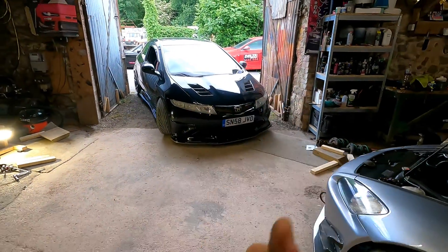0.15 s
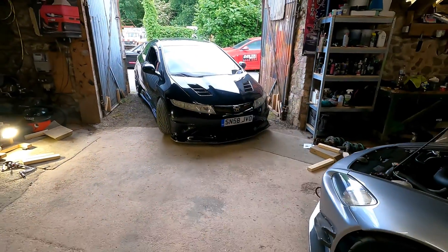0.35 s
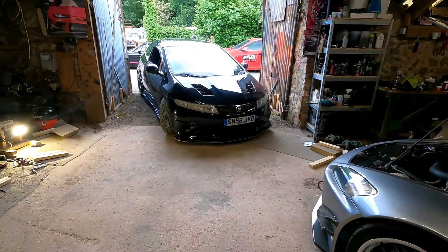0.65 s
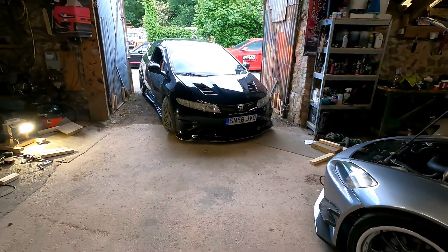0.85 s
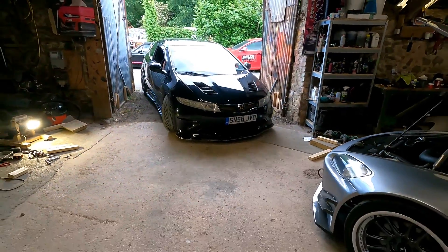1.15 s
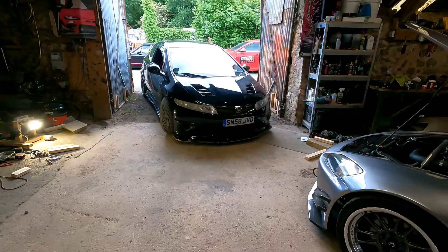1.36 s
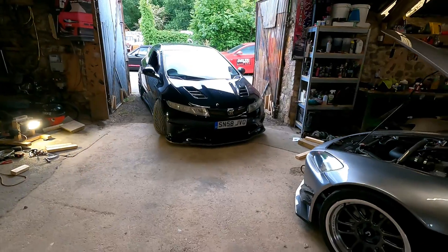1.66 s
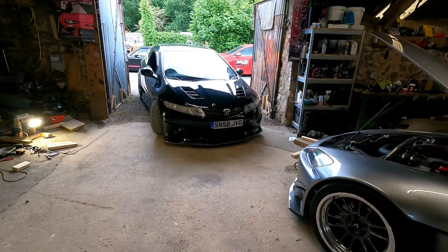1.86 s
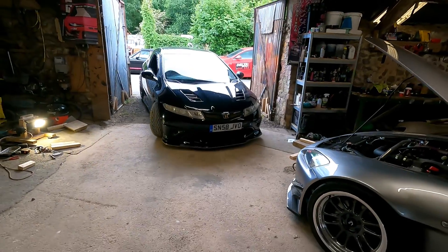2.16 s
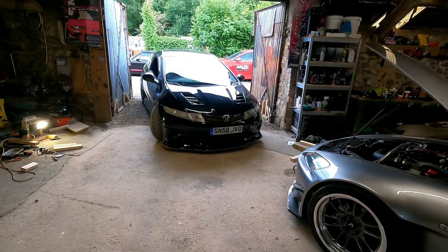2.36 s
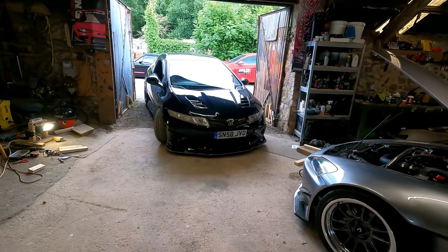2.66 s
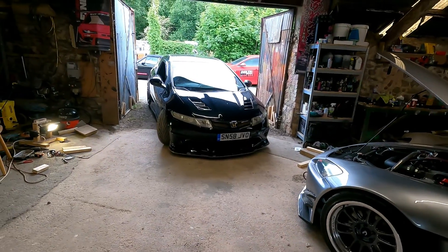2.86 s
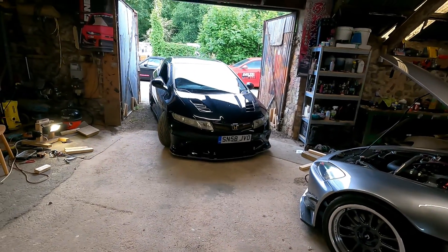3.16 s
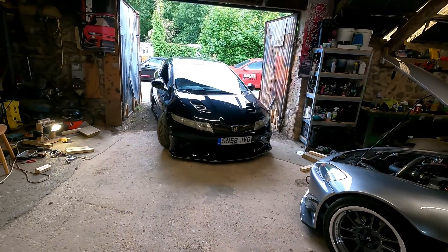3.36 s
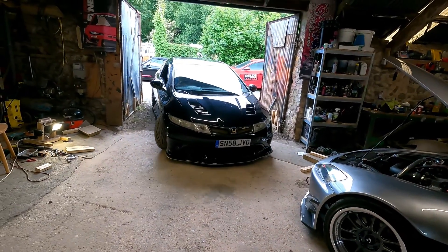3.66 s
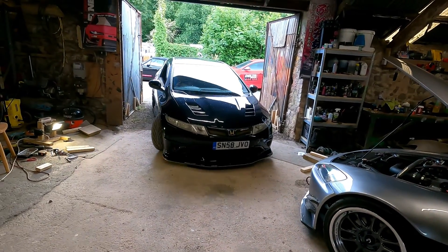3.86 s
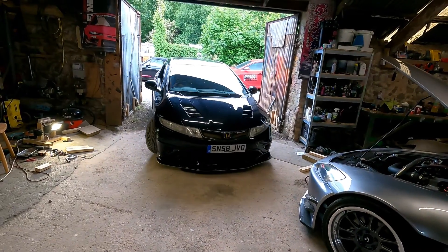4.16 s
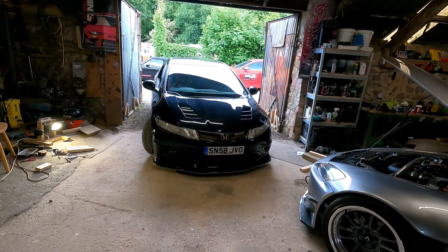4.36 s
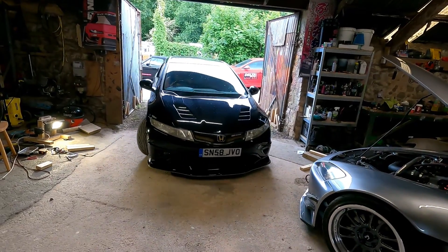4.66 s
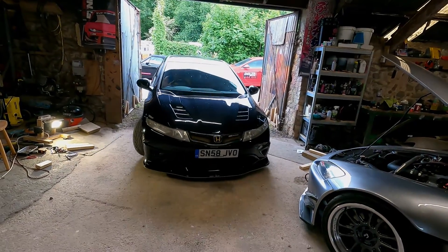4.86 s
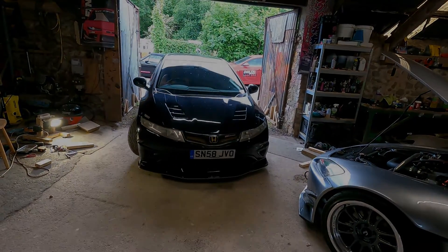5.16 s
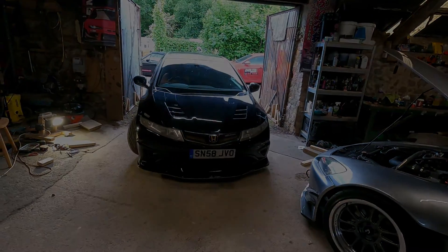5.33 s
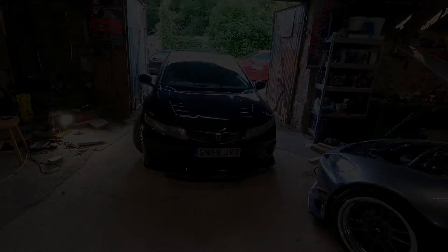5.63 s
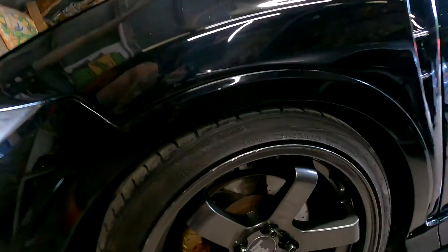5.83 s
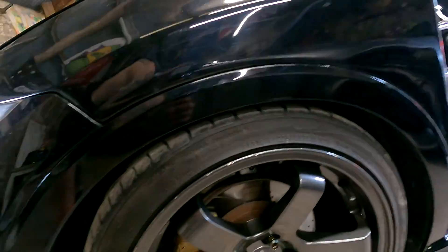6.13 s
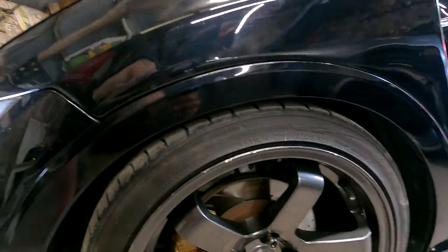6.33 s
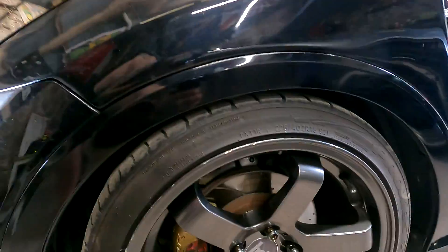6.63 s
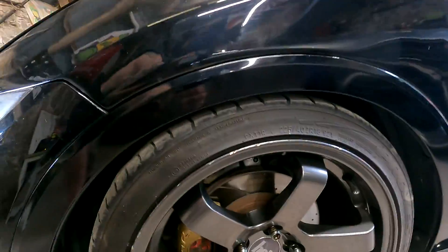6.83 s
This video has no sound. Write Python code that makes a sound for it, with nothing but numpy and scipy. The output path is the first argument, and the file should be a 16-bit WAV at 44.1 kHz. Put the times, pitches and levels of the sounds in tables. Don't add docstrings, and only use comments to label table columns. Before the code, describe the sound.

Microphone inside a garage, facing an idling car at the doorway. Boomy exhaust pulses, metallic rattling and small knocks give way to a quick double rev, the second higher and harder, with air tearing through the intake. The engine note sinks steadily and fades to nothing, then snaps back as a closer, even idle with mechanical rattle and hiss.

```python
import sys
import numpy as np
from scipy import signal
from scipy.fft import rfft, irfft, next_fast_len
from scipy.io import wavfile
from scipy.ndimage import uniform_filter1d, map_coordinates

SR = 44100
rng = np.random.default_rng(int(sys.argv[2]) if len(sys.argv) > 2 else 0)


def gain_from_db(level_db):
    decades = np.asarray(level_db, float) / 20
    return 10 ** decades


def pcm_store(signal):
    levels = np.round(np.clip(np.atleast_2d(signal), -1, 1) * 32767)
    wavfile.write(sys.argv[1], SR, levels.astype(np.int16).T)


N = 308259
T = np.arange(N) / SR
CUT = 5.829
NEAR = T >= CUT


def unit(x):
    return x / np.sqrt(np.mean(x ** 2) + 1e-20)


def steady(x, span):
    size = round(span * SR)
    power = uniform_filter1d(uniform_filter1d(x ** 2, size), size)
    return x / np.sqrt(np.abs(power) + 1e-12)


def along(points, hz):
    f, v = np.transpose(points)
    return np.interp(np.log(hz + 1), np.log(f + 1), v)


def curves(table):
    s, *cols = np.transpose(table)
    return [np.interp(T, s, c) for c in cols]


def ramp(start_s, span_s):
    return np.clip((T - start_s) / span_s, 0, 1)


def swells(rows, rise_db_s, fall_db_s):
    s, db, hold = np.transpose(rows)[:, :, None]
    early = np.clip(s - T, 0, None)
    late = np.clip(T - s - hold, 0, None)
    return np.max(db - rise_db_s * early - fall_db_s * late, axis=0)


def wobble(rate):
    knots = rng.standard_normal(int(N * rate / SR) + 4)
    return map_coordinates(knots, [np.arange(N) * rate / SR])


def filtered(x, response):
    m = next_fast_len(x.shape[-1] + SR // 2)
    return irfft(rfft(x, m) * response(np.fft.rfftfreq(m, 1 / SR)), m)[..., :x.shape[-1]]


def ringing(x, modes):
    def response(f):
        total = 0
        for k, (c, w, db) in enumerate(modes):
            total = total + (-1) ** k * gain_from_db(db) * 1j * f * w / (c * c - f * f + 1j * f * w)
        return total
    return filtered(x, response)


# f/Hz, likeness
ALIKENESS = [(60, 0.88), (150, 0.99), (370, 0.62), (930, 0.8), (2320, 0.63), (5790, 0.69), (14400, 0.92)]


def spread(pair, spectrum):
    def response(hz):
        turn = np.arccos(np.clip(along(ALIKENESS, hz), -1, 1)) / 2
        return gain_from_db(along(spectrum, hz)) * [np.cos(turn), np.sin(turn)]
    mid, side = filtered(pair, response)
    return unit(np.array([mid + side, mid - side]))


def patchy(patchy_db):
    z = signal.stft(rng.standard_normal((2, N)), nperseg=512)[2]
    field = uniform_filter1d(rng.standard_normal(z.shape[1:]), 5, 0)
    field = uniform_filter1d(field, 8, 1)
    return signal.istft(z * gain_from_db(patchy_db * unit(field)), nperseg=512)[1][:, :N]


# t/s, firings per second
FIRING_RATE = [(0, 28.3), (.8, 26.4), (1.65, 28.7), (2.72, 28.3), (2.85, 43), (2.93, 61.5), (3.08, 73.5),
               (3.22, 79.5), (3.37, 112), (3.48, 122), (3.7, 98.5), (3.92, 78), (4.2, 63.8), (4.6, 51.3),
               (4.95, 41.6), (5.3, 33.3), (5.6, 27.9), (6.99, 28.1)]
IDLE_RATE = FIRING_RATE[0][1]


def firing_rate():
    return curves(FIRING_RATE)[0]


# t/s, effort level/dB, load level/dB (sharpens the pulses)
EFFORT = [(0, 2, 0), (.25, -5.5, -0.5), (.7, -4, 0), (1.5, 0.5, -1.5), (2.68, -2.5, 1.5), (2.77, -2.5, 6),
          (2.88, -1, 7), (3.02, 2, 6.5), (3.15, -7.5, 6.5), (3.24, 4.5, 7.5), (3.32, 4.5, 6.5), (3.4, 1, 7),
          (3.52, -5.5, 1.5), (3.76, 7.5, 0), (3.95, -3, 3), (4.4, -0.5, 0.5), (5.27, -0.5, -4.5),
          (5.42, -4, -7)]


def effort_and_load():
    return np.where(NEAR, [[-3], [0]], curves(EFFORT))


CYLINDER_DB = [0, -1.6, .3, -1.4]


def uneven_firings(crank):
    at = np.flatnonzero(np.diff(np.floor(crank)))
    strength = gain_from_db(np.resize(CYLINDER_DB, len(at)) + 1.1 * rng.standard_normal(len(at)))
    return unit(np.bincount(at, strength - strength.mean(), len(crank)))


ORDER_DB = [-8.5, -12, -10.5, -12.5, -14, -14.5, -17.5, -32.5, -16, -20.5]
# t/s, level/dB
ROUGHNESS = [
    (0, 7),
    (.3, 13),
    (1.3, 14),
    (1.6, 19),
    (2.7, 19),
    (2.95, 12),
    (5.8, 12),
    (5.85, 10),
]
LEAD = SR // 4


def exhaust_pulses(turns):
    crank = np.r_[-IDLE_RATE * np.arange(LEAD, 0, -1) / SR, turns]
    phase = rng.uniform(0, 2 * np.pi, 24)
    size = gain_from_db(np.pad(ORDER_DB, (2, 24), "edge"))
    revving = np.clip((firing_rate() - 29) / 12, 0, 1)
    waver = [gain_from_db((.7 + 1.2 * revving) * wobble(13)) for _ in range(4)]
    second_gain = gain_from_db(-2.5 * (1 - revving))
    controls = [curves(ROUGHNESS)[0], *gain_from_db(effort_and_load()), second_gain, *waver]
    rough, effort, load, second_gain, *waver = np.pad(controls, ((0, 0), (LEAD, 0)), "edge")

    def order(k):
        return size[k] * waver[k % 4] * np.cos(2 * np.pi * k * crank + phase[k])

    second = second_gain * order(2)
    upper = sum(order(k) for k in range(3, 24))
    return second, upper, uneven_firings(crank), rough, effort, load


def voiced(pulses, places, rough_db, flow_db, sharp):
    second, upper, uneven, rough, effort, load = pulses
    irregular = gain_from_db(rough_db + rough) * uneven + gain_from_db(flow_db) * rng.standard_normal(len(uneven))
    drive = effort * (second + load * (upper + gain_from_db(-12) * irregular))
    heard = []
    for modes in places:
        rung = ringing(drive, modes)
        if sharp:
            rung = ringing(rung, modes)
        heard.append(rung[LEAD:])
    return np.where(NEAR, heard[1], heard[0])


# f/Hz, level/dB
FIRING_TONE_GAIN = [(28, -38), (34, -11.5), (44, -17), (56, -42), (66, -8.5), (83, -18), (97, -19),
                    (118, -18)]
# t/s, level over the tone/dB, hold/s
PULLS = [
    (3.24, 2, 0.025),
    (3.39, -7, 0.014),
]
# t/s, share lost level/dB, hold/s
LAGS = [
    (2.96, -5, 0.077),
    (3.6, -11, 0.22),
]


def firing_tone(turns):
    effort_db, _ = effort_and_load()
    follow_db = np.minimum(effort_db, 0.1 * effort_db)
    level_db = follow_db + along(FIRING_TONE_GAIN, firing_rate()) + 4.0 + 2.4 * wobble(12)
    bend = 1 + gain_from_db(swells(PULLS, 230, 200)) - gain_from_db(swells(LAGS, 100, 110))
    return bend * gain_from_db(level_db) * np.sin(2 * np.pi * turns)


# f/Hz, width/Hz, level/dB
BOOM_MODES = [
    [(72.2, 7.25, 0.5), (124.7, 6.45, 4.5), (141.6, 85, -13.5)],
    [(55, 9.8, -18), (76.8, 19, 3), (114, 36, -13), (152, 12, -6)],
]
# t/s, level over the boom/dB, hold/s
JOLTS = [
    (2.62, -8, 0.016),
    (2.76, 10, 0.084),
    (2.97, 1.5, 0.1),
]


def boom(pulses):
    jolt = 1 + gain_from_db(swells(JOLTS, 300, 150))
    return gain_from_db(-6) * jolt * voiced(pulses, BOOM_MODES, rough_db=-2, flow_db=9, sharp=False)


# f/Hz, width/Hz, level/dB
HUM_MODES = [
    [(189.8, 17.9, 0.043)],
    [(193, 24, 0)],
]
# t/s, level over the steady hum/dB, hold/s
SURGES = [
    (0, 8.5, 0.19),
    (.746, 6, 0.0039),
    (.88, 0, 0.2),
    (1.194, 4.5, 0.0062),
    (1.322, 6.5, 0.025),
    (1.66, 4, .1),
    (4.63, -9, 0.32),
    (5.04, 5.5, .01),
    (5.15, 0, .03),
]
# t/s, share lost level/dB, hold/s
STUMBLES = [(.42, -6.5, 0.28), (.81, -3, .01), (1.114, -4.5, .01), (1.256, -5.5, 0.0076),
            (1.41, -2.5, 0.0089), (2.116, -3, .01), (2.4, -12, .01), (3.3, -2.5, 0.032), (4.12, -2.5, 0.13),
            (4.5, -5, 0.03), (4.94, 0, .02), (5.09, 0.5, 0.011), (5.27, -0.5, 0.096)]


def hum():
    calm = gain_from_db(np.where(T < 1.5, 1.5, 0))
    surge = calm + gain_from_db(swells(SURGES, 234, 229))
    return surge * (1 - gain_from_db(swells(STUMBLES, 157, 190)))


def standing_wave(pulses):
    return gain_from_db(1) * hum() * voiced(pulses, HUM_MODES, rough_db=2, flow_db=12, sharp=True)


# f/Hz, width/Hz, level/dB
NEIGHBOUR_MODES = [
    [(169.4, 16, 2.5), (223.3, 31.3, 6), (245, 70, -11)],
    [(167.5, 16, -0.75), (228.6, 20, 0)],
]


def neighbouring_waves(pulses):
    level_db = -10.5 - 4.5 * ~NEAR * ramp(4.52, .12)
    return gain_from_db(level_db) * voiced(pulses, NEIGHBOUR_MODES, rough_db=-7, flow_db=7, sharp=True)


# f/Hz, width/Hz, level/dB
RASP_MODES = [(275.1, 7.5, -0.5), (345.2, 16, -7), (405.8, 7.8, -4), (561, 20, -11), (646, 4.7, -16)]


def rasp(pulses):
    _, load_db = effort_and_load()
    level_db = -14.5 + 0.69 * load_db - 10.5 * ~NEAR * ramp(3.77, 0.73)
    return gain_from_db(level_db) * voiced(pulses, [RASP_MODES, RASP_MODES], rough_db=-2, flow_db=16, sharp=False)


def rumble():
    effort_db, _ = effort_and_load()
    level_db = -29.5 + np.minimum(effort_db, 0) - 0.1665 * (firing_rate() - 36)
    roar = ringing(ringing(rng.standard_normal(N), [(30, 190, 0)]), [(30, 120, 0)])
    return gain_from_db(level_db) * unit(roar)


NEAR_DB = [14.5, -2.5, 0, 5.5, -3.5]


def exhaust(turns):
    pulses = exhaust_pulses(turns)
    parts = [firing_tone(turns), boom(pulses), standing_wave(pulses), neighbouring_waves(pulses), rasp(pulses)]
    *low, raspy = gain_from_db(np.outer(NEAR_DB, NEAR)) * parts
    mono = sum(low) + rumble()
    sides = np.array([[1], [-1]])
    return mono + 0.05 * np.roll(mono, 50) * sides + raspy + 0.095 * np.roll(raspy, 33) * sides


# t/s, level/dB
BAY_LEVEL = [(0, -32.5), (.9, -32.5), (1.9, -32), (2.6, -32), (2.75, -30), (3.1, -30.5), (3.27, -31),
             (3.36, -25.5), (3.5, -28.5), (3.72, -30.5), (3.87, -32.5), (4.0, -34.5), (4.4, -35.5),
             (4.9, -32), (5.82, -39), (5.83, -32), (6.4, -30.5), (6.99, -30)]
# f/Hz, width/Hz, level/dB
METAL_MODES = [(632, 32, -6), (1016, 96, 0.5), (1120, 260, -11.5), (1422, 154, 0.5)]
# f/Hz, level/dB
RATTLE_COLOUR = [(250, -3.5), (430, -2.5), (787, -4.5), (884, -0.5), (1490, 1.5), (1710, -1), (2000, -2.5),
                 (2600, -34), (4400, -120)]
# f/Hz, level/dB
HISS_COLOUR = [(1470, -34), (2500, 0.5), (2630, -2.5), (3040, 0.5), (4380, -0.5), (7540, -9), (8250, -12.5),
               (12300, -23.5), (13700, -38), (14900, -50)]


def engine_bay(turns):
    over_idle = firing_rate() - IDLE_RATE
    beat = np.exp(-3.2 * (turns % 1))
    level_db = curves(BAY_LEVEL)[0] + .6 * wobble(6) + .7 * wobble(14)

    noise = patchy(patchy_db=1.36) * (1 + 0.076 * beat)
    rattle = spread(noise + 2.35 * ringing(noise, METAL_MODES), RATTLE_COLOUR)
    rattle_db = 2.1 + 0.18 * wobble(9) - 2 * ramp(4.1, 0.33)

    whine = ringing(patchy(patchy_db=1.0), [(2258, 250, 0)])
    whine = spread(whine, [(1200, -7), (1900, 7.5), (2600, -2.5), (4000, -8)])
    whine_db = -5 + 0.05 * np.roll(over_idle, round(0.11 * SR))

    hiss = spread(patchy(patchy_db=.8) * (1 + 0.5 * beat), HISS_COLOUR)
    hiss_db = -2 - 0.03 * over_idle
    return gain_from_db(level_db) * (gain_from_db(rattle_db) * rattle + gain_from_db(whine_db) * whine + gain_from_db(hiss_db) * hiss)


# t/s, peak level/dB, ring f/Hz, t60/s, crack level/dB
TICKS = [
    (.893, -22, 1450, .03, -30),
    (1.1143, -13, 950, .014, -30),
    (1.1147, -17, 1450, .012, -30),
    (2.0816, -13, 2250, .012, 6),
    (2.0822, -19, 1050, .02, -30),
    (2.0918, -18, 1500, .008, -8),
    (2.613, -13.5, 1300, .008, -8),
]


def ticks():
    out, t = np.zeros((2, N)), np.arange(SR // 8) / SR
    for s, db, hz, t60, crack_db in TICKS:
        snap = gain_from_db(crack_db) * np.sin(2 * np.pi * np.minimum(2000 * t, 1)) * t / 0.00038
        grit = gain_from_db(crack_db - 26 - 60 * t / 0.0022) * rng.standard_normal(len(t))
        knock = gain_from_db(-60 * t / t60) * np.sin(2 * np.pi * hz * t)
        band = signal.butter(2, [600, hz * hz / 600], "band", fs=SR, output="sos")
        walls = gain_from_db(-5.5 - 60 * t / 0.07) * signal.sosfilt(band, rng.standard_normal((2, len(t))))
        out[:, round(s * SR):][:, :len(t)] += gain_from_db(db) * (knock + snap + grit + walls)
    return out


# f/Hz, width/Hz, level/dB
RUNNERS = [(555, 25, -3), (1165, 14, 0), (1565, 22, -1.5)]
# t/s, level/dB, hold/s
WHISTLES = [
    [(2.62, -30.5, 0.036), (2.7, -33, 0.026)],
    [(2.616, -28.5, 0.017), (2.685, -21, .06), (2.81, -30, .01)],
    [(2.616, -29, 0.011), (2.685, -25.5, .08), (3.15, -27.5, .05)],
]


def runner_whistles():
    out = 0
    for runner, rows in zip(RUNNERS, WHISTLES):
        tone = steady(ringing(rng.standard_normal(N), [runner]), 0.047)
        out = out + gain_from_db(swells(rows, 900, 420)) * tone
    return out


# t/s, gasp level/dB, hold/s
STROKES = [
    (2.69, -20.5, 0.16),
    (3.154, -20, 0.05),
    (3.35, -32, .04),
]
OPENING_DB_S = [350, 750, 200]
# f/Hz, width/Hz, level/dB
PLATE_EDGE_MODES = [(3380, 1400, 12.5), (4800, 270, 6), (7520, 500, -9), (9500, 200, 10.5), (10200, 400, 3)]
# f/Hz, level/dB
GASP_COLOUR = [(1470, -24), (2500, -3), (2950, -3), (3390, -1), (3910, -4.5), (5230, 6.5), (6310, 0.5),
               (7600, 6.5), (8960, 2), (12500, -7), (14900, -18)]


def throttle_gasp():
    opening = np.array(OPENING_DB_S)[:, None]
    rush_db = swells(np.multiply(STROKES, [1, 1, 0]), opening, 201)
    flow_db = -7 + swells(STROKES, opening, 102)
    air = patchy(patchy_db=1.5)
    gasp = spread(air + ringing(air, PLATE_EDGE_MODES), GASP_COLOUR)
    return gain_from_db(np.maximum(rush_db, flow_db) + 0.76 * wobble(40)) * gasp


# t/s, level/dB, hold/s
BARKS = [
    (2.75, -29, 0.055),
    (2.98, -31, 0.095),
    (3.255, -22.5, .01),
    (3.33, -19, 0.041),
]
# f/Hz, width/Hz, level/dB
AIR_BOX_MODES = [(620, 31, -4.5), (1187, 300, -14), (1460, 105, -12)]


def air_box_bark(turns):
    gulps = (.3 + np.exp(-4 * (turns % 1))) * (0.15 + rng.standard_normal((2, N)))
    colour = [(250, -27.5), (450, 3), (2000, 7), (3500, -32)]
    return gain_from_db(swells(BARKS, 170, 130)) * spread(ringing(gulps, AIR_BOX_MODES), colour)


def scene():
    turns = np.cumsum(firing_rate()) / SR
    away = np.clip((CUT - .007 - T) / (CUT - 4.59), 0, 1) ** 0.75
    back = ramp(CUT - 0.0049, 0.015) * gain_from_db(-4 * (T[-1] - T) / (T[-1] - CUT))
    intake = runner_whistles() + throttle_gasp() + air_box_bark(turns)
    return (away + back) * (exhaust(turns) + engine_bay(turns) + ticks() + intake)


def band_limit(x):
    return signal.sosfilt(signal.butter(12, 15030, fs=SR, output="sos"), x)


# f/Hz, left minus right level/dB
PORT_LEAN = [(100, -.5), (500, -1.5), (1000, -.3), (4000, -.6), (12000, -.3)]


def record(dry):
    def ports(hz):
        return gain_from_db(along(PORT_LEAN, hz) * [[.5], [-.5]]) / (1 + (hz / 14300) ** 30)
    x = filtered(dry, ports)
    x = x / (1 + np.abs(x / 1.02) ** 8) ** (1 / 8)
    return band_limit(x)


dry = scene()
out = record(dry)
pcm_store(out)
```